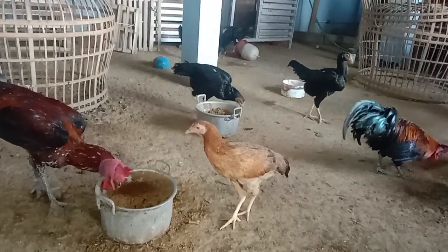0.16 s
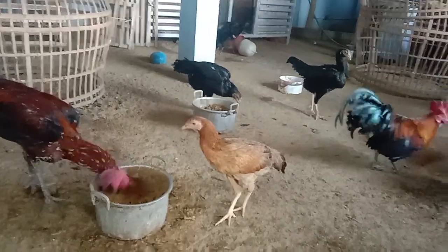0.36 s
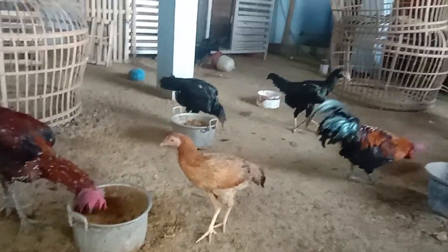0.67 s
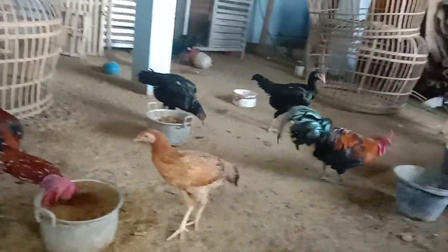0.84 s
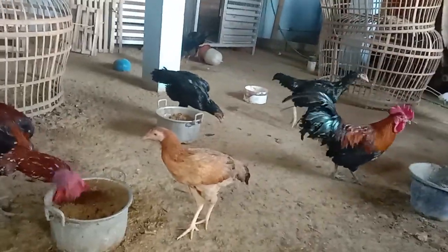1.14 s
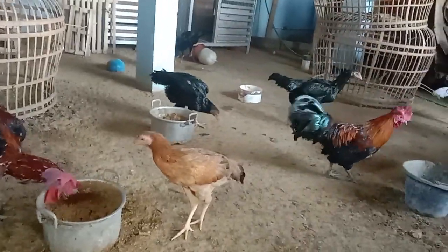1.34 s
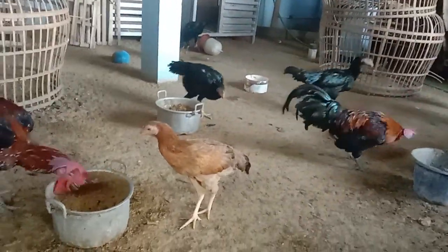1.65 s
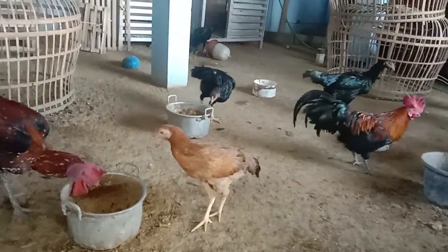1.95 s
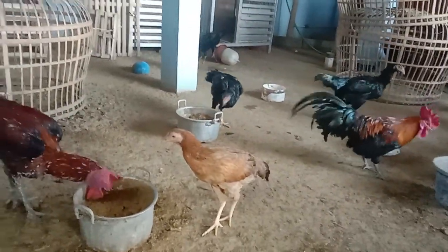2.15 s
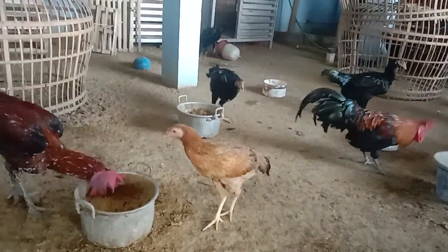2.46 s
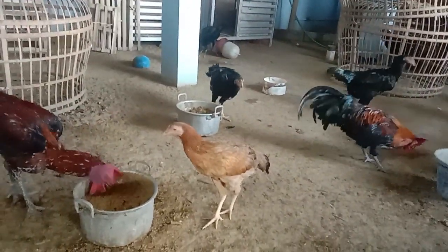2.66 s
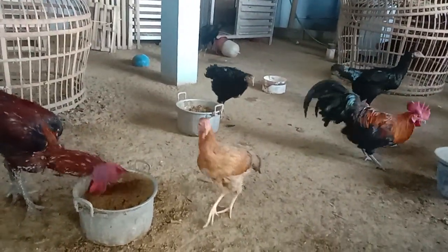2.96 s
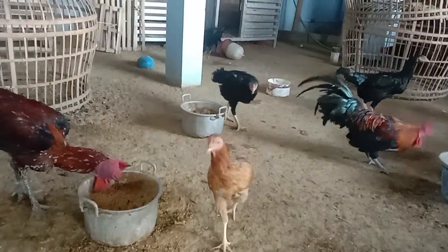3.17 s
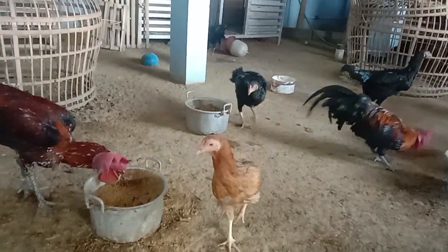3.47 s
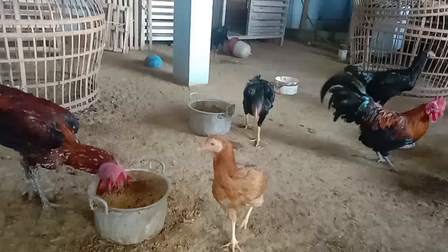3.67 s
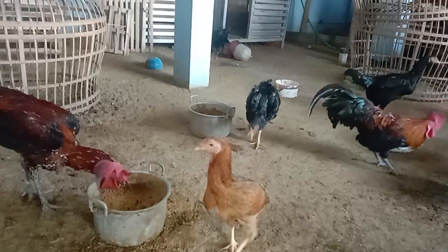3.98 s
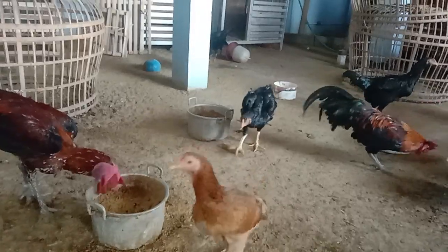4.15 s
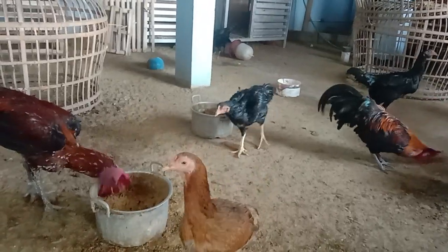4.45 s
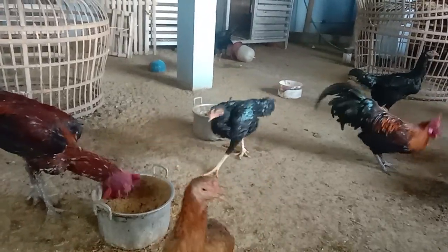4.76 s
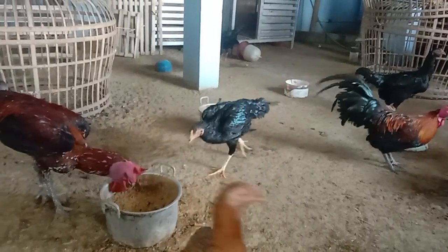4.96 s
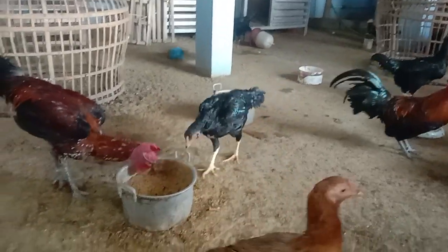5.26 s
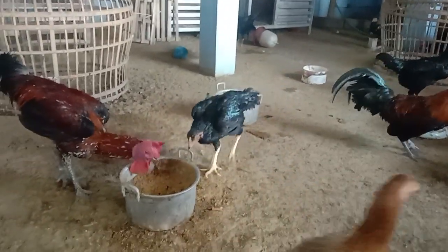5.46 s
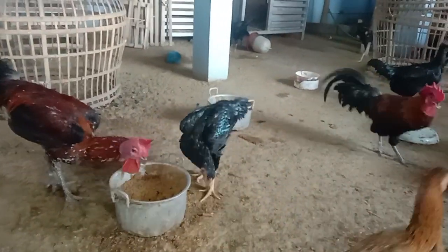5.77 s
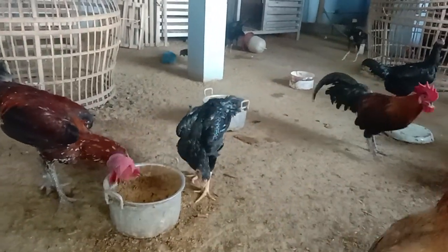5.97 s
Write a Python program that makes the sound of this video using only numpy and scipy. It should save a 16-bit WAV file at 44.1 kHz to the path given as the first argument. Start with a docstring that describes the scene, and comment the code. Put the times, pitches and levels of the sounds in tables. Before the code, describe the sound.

Several chickens feeding under a roof: quick clucks in three voices, one low and throaty, one rounder, one sharper and hissier, most dropping in pitch as they end. A hen call and rough rooster grumble come first, with soft low tones beneath. Later come small pecks on pots and ground, clucks thin out, and a clearer peck lands near the end. Close, mono, short hard-walled echo, quiet background.

```python
"""Chickens feeding in a roofed yard

A hen's drawn call and a rooster's low rising grumble open the scene: harmonics plus air, shaped by throats.
Quick clucks in three voices follow, each an opening note breaking to a second one, usually lower; effort
adds treble and hiss. Beaks tick on pots and floor (noise bursts and decaying sines), claws scratch (noise
bands), a chick peeps and soft low tones sound (near-sines). Hard walls prolong all of these over a far
rumble and faint air.
"""
import sys
import numpy as np
from scipy import signal
from scipy.fft import rfft, irfft, next_fast_len
from scipy.io import wavfile
from scipy.ndimage import map_coordinates

SR = 44100
rng = np.random.default_rng(int(sys.argv[2]) if len(sys.argv) > 2 else 0)


def put_to_file(sound):
    """Save the sound as 16-bit audio at rate SR, in the file named by the first command-line argument."""
    columns = np.atleast_2d(sound).T  # one column per channel
    safe = np.clip(columns, -1, 1)
    whole_steps = np.round(safe * 32767)
    wavfile.write(sys.argv[1], SR, whole_steps.astype(np.int16))


N = 269892

# Far rumble and faint air, spectra: f/Hz, density/dB
RUMBLE_SPECTRUM = [(20, -30), (45, -11), (70, 2), (110, 4.5), (160, 0), (240, -13), (330, -0.5), (450, -21),
                   (900, -40.5), (3000, -68.5)]
AIR_SPECTRUM = [(200, -21), (600, 0), (1500, -6.5), (3000, -15), (4400, -14.5), (5500, -22), (7800, -16.5),
                (9300, -34), (15000, -25.5)]
# Their drift: t/s, rumble/dB, air/dB
BACKGROUND_LEVELS = [(0, -61, -72), (.7, -62, -75), (1.4, -63, -80), (2.3, -67, -81), (3.3, -66, -80),
                     (4.1, -68, -79), (4.9, -65, -79), (6.12, -65, -80)]
# Wall reverberation: f/Hz, T60/s
WALL_T60 = [(150, 0.27), (400, 0.32), (800, 0.265), (2600, 0.265), (5500, 0.22), (12000, 0.07)]
# Standing waves between floor and roof: f/Hz, relative level/dB
STANDING_WAVES = [(152, 7.5), (205, -8.5), (248, -1), (310, -9), (441, -3.5), (593, -6.5)]
# Soft low tones, and a chick's peeps: t/s, length/s, f/Hz, level/dB
LOW_TONES = [(.2, .088, 149, -43), (.34, .075, 331, -51), (.52, .23, 153.8, -46), (.76, .17, 311, -54),
             (.96, .071, 325.5, -44.5), (1.0, .09, 76.1, -55), (1.08, .23, 334.2, -47.5),
             (1.99, .08, 320, -55), (3.13, .07, 320, -54), (3.52, .064, 328, -47.5),
             (4.64, .079, 130, -57.5)]
CHICK_PEEPS = [(1.88, .066, 3680, -51), (3.55, .05, 3640, -67), (5.555, .035, 3800, -71),
               (5.71, .025, 2760, -67)]
# Claws in the dirt: t/s, centre f/Hz, level/dB
CLAW_SCUFFS = [(.089, 3520, -49), (.148, 6060, -51), (.172, 3880, -51), (.199, 7740, -64),
               (.283, 7000, -60), (.345, 4700, -66), (.405, 5200, -68), (1.88, 6650, -55),
               (3.132, 4600, -57), (4.33, 6300, -59.5)]
# Beak blows on pots and floor: t/s, level/dB, body (tilt towards the lows)/dB
BEAK_PECKS = [(3.123, -57, 3), (3.517, -45, 5), (4.0716, -59, -7), (4.2592, -54.5, 13.5),
              (4.6134, -61.5, 17.5), (5.2205, -67, -6), (5.908, -40, 2)]
# Grit under a blow: f/Hz, density/dB
GRIT_SPECTRUM = [(800, -46.5), (1700, -1.5), (2700, -10), (3300, -0.5), (4500, -4.5), (7500, -11.5),
                 (8800, -19.5), (9600, -40.5), (15000, -28.5)]
# Ringing modes of an aluminium feed pot: f/Hz, level/dB, T60/s
POT_MODES = [(1800, -33, .6), (4600, -31, .35), (7900, -34, .4)]
# Drawn-call notes: t/s, length/s, opening f/Hz, closing f/Hz, level/dB, opening brightness/dB
HEN_NOTES = [(0, .016, 383, 380, -22, -5), (.06, .075, 376, 374, -22.5, 10)]
ROOSTER_NOTES = [(.033, .06, 192, 208, -28, -2), (.09, .073, 204, 250, -22, 4),
                 (.167, .04, 285, 312, -21, 9), (.205, .028, 300, 330, -26, 2)]
# Their throats: f/Hz, gain/dB
HEN_THROAT_GAIN = [(150, -40), (370, -6), (760, 8.5), (1130, -7), (1500, -8), (1870, -9), (2300, -32.5),
                   (3500, -34.5), (5000, -41), (8000, -56), (10000, -77.5)]
ROOSTER_THROAT_GAIN = [(50, -55), (130, -12), (200, 0.5), (420, 2), (620, 2), (850, -5), (1250, -9),
                       (1700, -21), (2400, -24), (3000, -30), (4200, -29), (5500, -58), (8000, -55.5),
                       (10000, -90.5)]
# Clucks: t/s, voice, level/dB, opening f/Hz, closing f/Hz, pitch break after peak/s, effort as treble lift/dB,
# throat resonance f/Hz, beak resonance f/Hz, swell/s, room/dB, far-wall echo/dB
CLUCK_EVENTS = [ (.281, "low", -17.5, 545, 505, .002, -6, 720, 2500, .009, -7, -22),
                (.464, "sharp", -28, 870, 680, .001, 2.5, 560, 1850, .010, -2, -9),
                (.727, "low", -22.5, 570, 610, -.004, 1, 700, 2600, .013, 1, -18),
                (.936, "round", -20.5, 940, 745, -.005, 4.5, 780, 2400, .014, -3, -22),
                (1.118, "sharp", -26.5, 890, 690, -.002, 1, 650, 1550, .015, -2.5, -12),
                (1.171, "sharp", -28.5, 880, 690, -.002, -12, 720, 1550, .009, -7, -22),
                (1.439, "round", -22, 1000, 700, .002, 5.5, 900, 2350, .010, 1.5, -9),
                (1.758, "round", -22.5, 1020, 700, -.005, 6, 960, 2650, .009, 1, -15),
                (1.974, "round", -20.5, 1040, 760, .003, 5, 1040, 2500, .013, -.5, -12),
                (2.165, "sharp", -22, 920, 730, -.003, -1, 860, 1850, .016, -3.5, -10),
                (2.639, "low", -35, 545, 520, -.002, 3, 620, 3050, .009, 1, -22),
                (2.844, "round", -19, 1020, 745, -.011, -8.5, 740, 2250, .012, -7, -22),
                (2.978, "round", -32.5, 920, 800, -.002, -3, 950, 2450, .013, -1.5, -19),
                (3.005, "sharp", -19.3, 925, 735, -.004, -3, 800, 1550, .009, -5, -18),
                (3.444, "round", -37, 900, 760, -.004, -7, 800, 2300, .011, 3, -19),
                (3.485, "round", -22.8, 930, 745, -.004, -2.5, 920, 2400, .011, -1, -19),
                (3.658, "sharp", -38, 940, 800, .003, 6, 950, 1900, .012, 1, -16),
                (3.676, "sharp", -21.8, 920, 725, -.007, -4, 900, 1600, .007, -5.5, -13),
                (4.15, "low", -31.5, 500, 440, -.003, 1, 740, 2900, .0066, -1.5, -18),
                (4.313, "round", -34, 720, 661, -.006, -22, 680, 2350, .006, -1, -19),
                (4.364, "round", -21, 900, 700, -.007, -7, 700, 2250, .008, -1, -19),
                (4.542, "low", -22.5, 565, 600, .002, -3, 660, 2350, .013, -.5, -16),
                (4.753, "sharp", -21.5, 985, 750, -.004, 2.5, 980, 2100, .014, -4, -20),
                (4.991, "sharp", -27.3, 890, 720, -.005, -1, 800, 1750, .010, -4, -9),
                (5.275, "sharp", -28.5, 935, 690, -.001, 6, 800, 2400, .013, .5, -10),
                (5.768, "low", -37.5, 570, 490, -.001, 0, 1300, 2800, .006, 1, -18), ]
# Cluck voices: release/s, pitch-break length/s, opening-note fall/(octave/s), hiss/dB,
# hiss growth/(dB per dB effort), base roughness/(0-1)
CLUCK_VOICES = { "sharp": (.0088, .0025, 4.5, -20.5, .3, .14), "round": (.009, .0014, 4.5, -32.5, 1.2, .23),
                "low": (.0095, .003, -1, -36, .1, .29), }
# Throat of each cluck voice: f/Hz, gain/dB
CLUCK_THROATS = { "sharp": [(80, -72), (350, -27), (520, -7.5), (720, 8.5), (830, 4.5), (950, 7.5),
                 (1200, -12), (1450, -10), (1900, -11.5), (2500, -13), (4400, -23.5), (5200, -41),
                 (7500, -45), (9500, -73)], "round": [(80, -74), (330, -26), (520, -9), (710, 8.5),
                 (850, 3.5), (1020, 6), (1350, -4.5), (1800, -12), (2750, -9.5), (3300, -25), (4300, -23.5),
                 (5200, -41), (7500, -46), (9500, -73)], "low": [(80, -70), (330, -27), (520, -3), (700, 5),
                 (880, 0), (1120, 5.5), (1400, -4.5), (1800, -15), (2700, -13.5), (3500, -27),
                 (4400, -28.5), (5200, -42), (7500, -47), (9500, -73)], }
# Air forced through the beak: f/Hz, gain/dB
HISS_GAIN = [(1200, -56), (3000, 2), (4400, 3.5), (5100, -6), (6500, -4.5), (7900, -6), (9300, -27),
             (15000, -35)]

BAND_LIMIT_HZ = 15500
FAR_WALL_DELAY_S, FAR_WALL_LOWPASS_HZ = .053, 1200
FAR_CHIRP_MEAN_HZ, FAR_CHIRP_MEAN_DB, FAR_CHIRP_MEAN_S = 7300, -79, .035
SCUFF_SWELL_S = .008
PECK_T60_S = .05
BRUSH_DB, BRUSH_S = -17, .005  # beak brushing feed around the strike
NOTE_RELEASE_S = .008
SAG_DB_PER_S, DULLING_DB_PER_S = 45, 200  # a drawn note runs out of air
THROAT_PEAK_DB, THROAT_WIDTH = 2.5, .16  # width as log-frequency scale
BEAK_PEAK_DB, BEAK_WIDTH = 6.5, .12
BEAK_FALL_OCTAVES_PER_S = 7  # resonance falls as the beak shuts
CLOSING_FALL_OCTAVES_PER_S = 3.5
CLUCK_DULLING_DB_PER_S = 90
CLUCK_HIGHPASS_HZ = 380  # a cluck carries little below this
RASP_DB, RASP_KNOTS_PER_S = 5, 400  # depth at roughness 1
ROUGH_PER_EFFORT_DB = .015
OPENING_ROUGH_SHARE = .7  # of the closing note's roughness


def amp(db):
    """Amplitude ratio of a level in dB."""
    return 10 ** (np.asarray(db) / 20)


def unit(x):
    """x scaled to rms 1."""
    return x / np.sqrt(np.mean(x ** 2) + 1e-20)


def along(points, hz):
    """(Hz, value) points interpolated on a log axis, held flat beyond the ends."""
    f, v = np.transpose(points)
    return np.interp(np.log(hz + 1), np.log(f + 1), v)


def wobble(knots_per_s, size):
    """Smooth random curve."""
    knots = rng.standard_normal(int(size * knots_per_s / SR) + 4)
    return map_coordinates(knots, [np.arange(size) * knots_per_s / SR])


def ripple(hz, spacing_hz=330):
    """Chance peaks and dips along frequency, about 1 in size."""
    return map_coordinates(rng.standard_normal(128), [hz / spacing_hz], mode="mirror")


def resonance(hz, centre_hz, width):
    """Bell of height 1 along log frequency."""
    return np.exp(-(np.log((hz + 1) / centre_hz) / width) ** 2)


def coloured(x, gain_db):
    """x through a frequency-dependent gain, brought to rms 1."""
    hz = np.fft.rfftfreq(len(x), 1 / SR)
    return unit(irfft(rfft(x) * amp(gain_db(hz)), len(x)))


def noise(gain_db, size):
    """Coloured noise of rms 1."""
    return coloured(rng.standard_normal(size), gain_db)


def add(track, s, sound):
    """Mix a sound into the track from time s."""
    i = max(round(s * SR), 0)
    track[i:i + len(sound)] += sound[:len(track) - i]


def background():
    """Far, uneven rumble under faint air: two shaped noises, both drifting in level."""
    s, *levels = np.transpose(BACKGROUND_LEVELS)
    rumble_db, air_db = [np.interp(np.arange(N) / SR, s, level) for level in levels]
    swell_db = 3 * wobble(8, N)
    rumble = noise(lambda hz: along(RUMBLE_SPECTRUM, hz), N) * amp(rumble_db + swell_db)
    air = noise(lambda hz: along(AIR_SPECTRUM, hz) + ripple(hz), N)
    air *= amp(air_db + 1.3 * wobble(5, N))
    return rumble + air


def in_yard(x, wet_db, gap_s=0.0064, build_s=0.015, ripple_db=4):
    """Sound plus wall reverberation: decaying noise; each call draws its own colouring for place and facing."""
    hz, t, z = signal.stft(rng.standard_normal(SR * 3 // 5), SR, nperseg=256)
    decay = amp(-60 * t / along(WALL_T60, hz)[:, None])
    tail = signal.istft(z * decay, SR, nperseg=256)[1]
    tail *= np.clip((np.arange(len(tail)) / SR - gap_s) / build_s, 0, 1)
    size = next_fast_len(len(x) + len(tail), real=True)
    hz = np.fft.rfftfreq(size, 1 / SR)
    direct = rfft(x, size)
    # some narrow bands answer more strongly than others
    wet = direct * rfft(tail, size) * amp(3 * ripple(hz, spacing_hz=129))
    wet *= amp(wet_db) * np.linalg.norm(direct) / np.linalg.norm(wet)
    ripple_share = along([(900, 0.32), (2000, 0.24), (4000, 1)], hz)
    colour = amp(ripple_db * ripple_share * (ripple(hz) - 1.0))
    return irfft((direct + wet) * colour, size)[:len(x) + SR // 2]


def far_wall(x, echo_db):
    """Sound followed by one low-passed echo."""
    lowpass = signal.butter(2, FAR_WALL_LOWPASS_HZ, fs=SR, output="sos")
    echo = signal.sosfilt(lowpass, x)
    delay = round(FAR_WALL_DELAY_S * SR)
    return np.pad(x, (0, delay)) + amp(echo_db) * np.pad(echo, (delay, 0))


def with_standing_waves(x, width_hz=13, ring_db=-2):
    """Resonators at the yard's standing waves make a low sound boom."""
    size = next_fast_len(N + SR // 4)
    f = np.fft.rfftfreq(size, 1 / SR)
    ring = 0
    for hz, db in STANDING_WAVES:
        damping = 1j * f * width_hz
        ring = ring + amp(db + ring_db) * damping / (hz * hz - f * f + damping)
    return irfft(rfft(x, size) * (0.61 + ring), size)[:N]


def notes(rows, glide, waver, wet_db, waver_knots_per_s=90):
    """Nearly pure notes that swell, glide a little and fade."""
    out = np.zeros(N)
    for s, length, hz, db in rows:
        u = np.linspace(0, 1, int(length * SR))
        pitch = hz * (1 + glide * (u - .5) + waver * wobble(waver_knots_per_s, len(u)))
        shape = np.sqrt(np.abs(np.sin(np.pi * u)))
        note = shape * np.sin(2 * np.pi * np.cumsum(pitch) / SR)
        add(out, s, in_yard(amp(db) * note, wet_db))
    return out


def far_birds(count=30):
    """Faint, thin chirps of small far birds: short wavering notes at chance moments."""
    rows = []
    for when, length, pitch, level in rng.random((count, 4)):
        length_s = FAR_CHIRP_MEAN_S * (.5 + length)
        hz = FAR_CHIRP_MEAN_HZ * (1 + .3 * (pitch - .5))
        rows.append((6 * when, length_s, hz, FAR_CHIRP_MEAN_DB + 6 * (level - .5)))
    return notes(rows, glide=-.04, waver=.025, wet_db=0, waver_knots_per_s=1200)


def low_tones():
    """Soft low tones: wavering near-sines with a slight downward glide."""
    return notes(LOW_TONES, glide=-.02, waver=.025, wet_db=-7)


def chick_peeps():
    """Chick's peeps: short, high, wavering near-sines with a slight upward glide."""
    return notes(CHICK_PEEPS, glide=.03, waver=.04, wet_db=-5, waver_knots_per_s=900)


def scuffs(width=0.22, grain_db=2.5, wet_db=0):
    """Claws scratch the dirt: short strokes of uneven noise in a band proportional to its centre."""
    out = np.zeros(N)
    t = np.arange(-SR // 20, SR // 20) / SR
    for s, centre_hz, db in CLAW_SCUFFS:
        def band(hz):
            bell_db = np.maximum(-8 * (np.log((hz + 1) / centre_hz) / width) ** 2, -30)
            return bell_db + along([(8200, -0.5), (9300, -12.5)], hz)
        grains = unit(noise(band, len(t)) * amp(grain_db * wobble(800, len(t))))
        stroke = amp(db) * np.exp(-(t / SCUFF_SWELL_S) ** 2) * grains
        add(out, s + t[0], in_yard(stroke, wet_db, ripple_db=1))
    return out


def pecks(attack_s=0.005, grain_db=3.5, wet_db=-2, strike_db=4):
    """A beak brushes the feed, strikes, scatters grit and rings the pot; more body sounds lower."""
    out = np.zeros(N)
    t = np.arange(-SR // 40, SR // 3) / SR
    after = np.maximum(t, 0)
    for s, db, body_db in BEAK_PECKS:
        def spectrum(hz):
            body_share = along([(3000, 0.78), (5500, 0.22)], hz)
            return along(GRIT_SPECTRUM, hz) + body_db * body_share
        grit = noise(spectrum, len(t))
        grit *= amp(grain_db * wobble(700, len(t)))
        blow = amp(strike_db - 60 * after / PECK_T60_S) * (1 - np.exp(-after / attack_s))
        brush = amp(BRUSH_DB) * np.exp(-np.abs(t) / BRUSH_S)
        ring = 0
        for hz, level_db, t60_s in POT_MODES:
            ring = ring + amp(level_db - 60 * after / t60_s) * np.sin(2 * np.pi * hz * after)
        peck = amp(db) * ((blow + brush) * grit + ring)
        add(out, s + t[0], in_yard(peck, wet_db, ripple_db=-1.5))
    return out


def throat_gain(points, bright_db=0):
    """Gain/dB by frequency; brightness acts mainly on the upper partials."""
    return lambda hz: along(points, hz) + bright_db * along([(1100, 0.03), (2000, 0.97)], hz)


def syrinx(pitch, throat, rough, jitter, jitter_knots_per_s=500, lift_db=0, beak_hz=None):
    """Unsteady membrane's harmonics plus air puffed once a cycle, shaped by throat and optional beak."""
    size = len(pitch)
    unsteady = pitch * (1 + jitter * wobble(jitter_knots_per_s, size))
    phase = 2 * np.pi * np.cumsum(unsteady) / SR
    k = np.arange(1, int(10000 / pitch.max()))[:, None]  # harmonics up to about 10 kHz
    partial_hz = k * pitch
    gain_db = throat(partial_hz) + lift_db * along([(1000, 0.02), (1500, 0.85)], partial_hz)
    tract = throat
    if beak_hz is not None:
        gain_db = gain_db + BEAK_PEAK_DB * resonance(partial_hz, beak_hz, BEAK_WIDTH)
        # the air sees the beak held at its midway position
        tract = lambda hz: throat(hz) + BEAK_PEAK_DB * resonance(hz, beak_hz[size // 2], BEAK_WIDTH)
    partials = amp(gain_db) * np.sin(k * phase + rng.uniform(0, 2 * np.pi, k.shape))
    tone = unit(np.sum(partials, axis=0))
    air = coloured(rng.standard_normal(size) * (1 + np.cos(phase)), tract)
    air_share = np.clip(rough, 0, 1)
    return np.sqrt(1 - air_share) * tone + np.sqrt(air_share) * air


def drawn_call(rows, throat, attack_s, rough, jitter, wet_db):
    """Longer notes: each starts quickly, glides while it weakens and dulls, then dies away."""
    out = np.zeros(N)
    t = np.arange(SR // 5) / SR
    for s, length, open_hz, close_hz, db, bright_db in rows:
        held = np.minimum(t, length)
        pitch = open_hz + (close_hz - open_hz) * held / length
        voice = syrinx(pitch, throat_gain(throat), rough, jitter, jitter_knots_per_s=250,
                       lift_db=bright_db - DULLING_DB_PER_S * held)
        attack = np.minimum(t / attack_s, 1)
        release = np.exp((held - t) / NOTE_RELEASE_S)
        shape = attack * amp(-SAG_DB_PER_S * held) * release
        add(out, s, in_yard(amp(db) * shape * voice, wet_db))
    return out


def hen_call():
    """Hen's drawn call: a fairly clear syrinx."""
    return drawn_call(HEN_NOTES, HEN_THROAT_GAIN, attack_s=.003, rough=.13, jitter=0.018, wet_db=-4)


def rooster_grumble():
    """Rooster's low rising grumble: a rougher syrinx booming in the standing waves."""
    call = drawn_call(ROOSTER_NOTES, ROOSTER_THROAT_GAIN, attack_s=.014, rough=0.36, jitter=0.035, wet_db=-8)
    return with_standing_waves(call)


def clucks(jitter=.04, opening_swells=1.9, leak=0.26, hiss_lead_s=0.0042, hiss_width_s=0.012, hiss_rough=0.4):
    """The throat opens on a sliding note, breaking to a rougher, drooping one, usually lower, as the beak shuts."""
    out = np.zeros(N)
    t = np.arange(-SR // 16, SR // 16) / SR  # 0 at the cluck's peak
    highpass = signal.butter(4, CLUCK_HIGHPASS_HZ, "highpass", fs=SR, output="sos")
    for (s, kind, db, open_hz, close_hz, break_s, effort_db,
         throat_hz, beak_hz, swell, room_db, echo_db) in CLUCK_EVENTS:
        release, break_length, slide, hiss_db, hiss_growth, rough = CLUCK_VOICES[kind]
        rough = np.clip(rough + ROUGH_PER_EFFORT_DB * effort_db, .03, 1)
        within = np.clip(t, -2 * swell, 2 * release)

        opening = open_hz * 2 ** (-slide * np.maximum(within - break_s + swell, -swell))
        closing = close_hz * 2 ** (-CLOSING_FALL_OCTAVES_PER_S * (within - release / 2))
        broken = (1 + np.tanh((t - break_s) / break_length)) / 2
        pitch = opening + (closing - opening) * broken

        base_throat = throat_gain(CLUCK_THROATS[kind], effort_db)
        throat = lambda hz: base_throat(hz) + THROAT_PEAK_DB * resonance(hz, throat_hz, THROAT_WIDTH)
        roughness = rough * (OPENING_ROUGH_SHARE + (1 - OPENING_ROUGH_SHARE) * broken)
        moving_beak_hz = beak_hz * 2 ** (-BEAK_FALL_OCTAVES_PER_S * within)
        shape = np.exp(-np.abs(t / np.where(t < 0, swell, release)) ** 1.14)
        voice = shape * syrinx(pitch, throat, roughness, jitter,
                               lift_db=-CLUCK_DULLING_DB_PER_S * within, beak_hz=moving_beak_hz)

        # partly voiced hiss, centred just before the peak
        hiss_shape = np.exp(-np.abs((t + hiss_lead_s) / hiss_width_s) ** 1.8)
        hiss = hiss_shape * syrinx(pitch, throat_gain(HISS_GAIN), hiss_rough, jitter / 2)
        hiss *= amp(hiss_db + hiss_growth * effort_db)

        opened = leak + (1 - leak) / (1 + np.exp(-(t + opening_swells * swell) / 0.001))
        rasp = unit(amp(RASP_DB * rough * wobble(RASP_KNOTS_PER_S, len(t))))
        cluck = signal.sosfilt(highpass, amp(db) * opened * rasp * (voice + hiss))
        add(out, s + t[0], in_yard(far_wall(cluck, echo_db), room_db, ripple_db=2.5))
    return out


def scene():
    """All birds and the background, summed to one channel."""
    far = background() + far_birds()
    small = low_tones() + chick_peeps() + scuffs() + pecks()
    calls = hen_call() + rooster_grumble() + clucks()
    return (far + small + calls)[None]


def record(dry):
    """Remove everything from the band limit up."""
    size = next_fast_len(N + SR // 4)
    kept = np.fft.rfftfreq(size, 1 / SR) < BAND_LIMIT_HZ
    return irfft(rfft(dry, size) * kept, size)[:, :N]


dry = scene()
out = record(dry)
put_to_file(out)
```